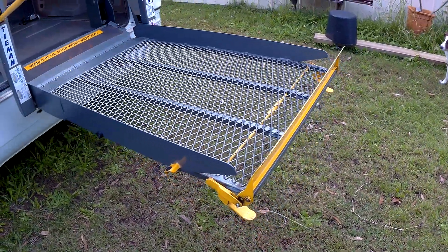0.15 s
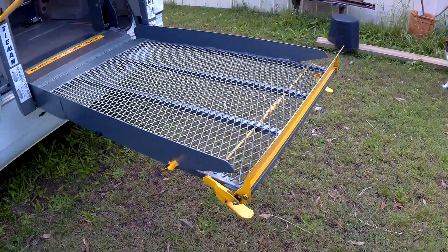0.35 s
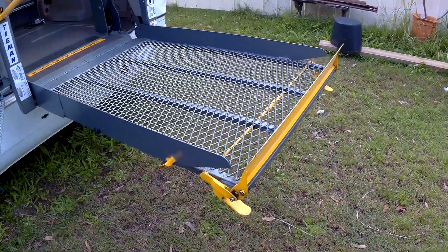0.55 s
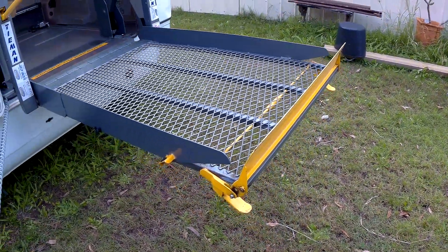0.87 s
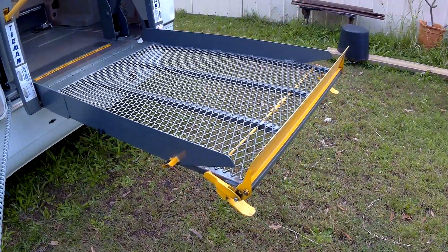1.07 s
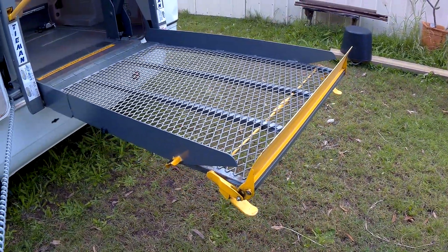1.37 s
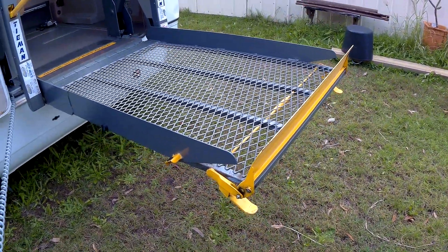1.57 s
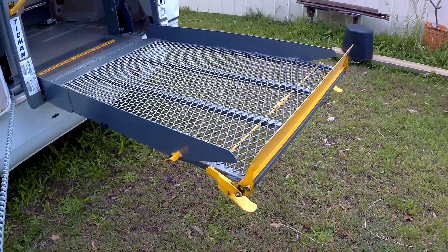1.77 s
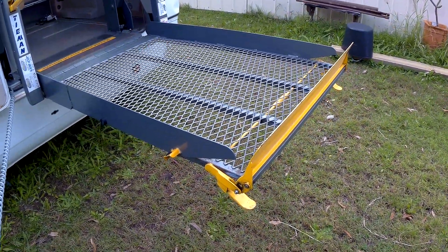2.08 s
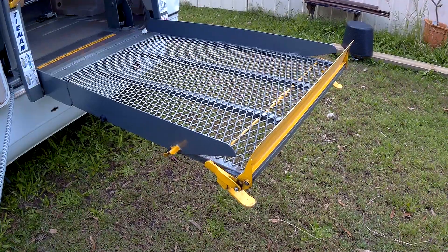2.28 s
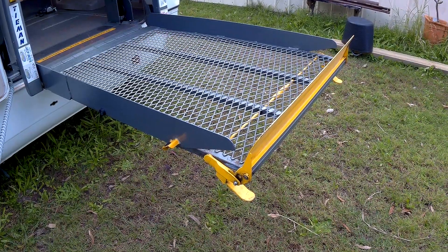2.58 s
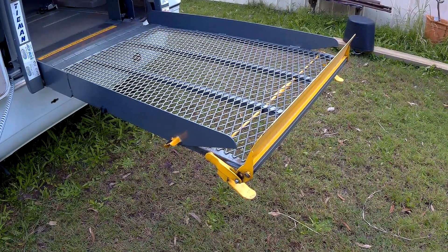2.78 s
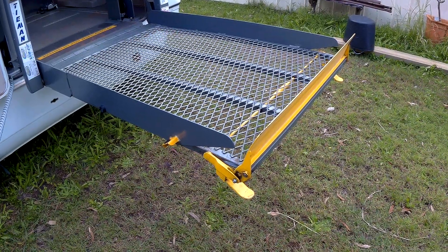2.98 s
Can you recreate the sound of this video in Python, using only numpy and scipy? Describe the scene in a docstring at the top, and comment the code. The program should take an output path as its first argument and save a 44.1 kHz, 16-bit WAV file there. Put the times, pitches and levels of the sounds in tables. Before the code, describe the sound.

A wheelchair lift's electric pump motor whines steadily, cuts out abruptly with a metallic clunk and bounce, while a diesel engine idles nearby; outdoors, one microphone, soft air noise and a late wind puff.

```python
"""Wheelchair lift stopping beside an idling diesel

Outdoors by a vehicle lift: its electric pump motor whines as tones on multiples of the shaft speed over hiss,
then cuts out with a clunk and a bounce, made of struck frame modes, shaken noise and a booming floor panel.
A four-cylinder diesel idles nearby, a throb with knocks, puffs and pops, and speeds up a little when the load drops.
Shaped noise gives the air and rumble; low swelling tones buffet the microphone, with a late puff of wind."""
import sys
import numpy as np
from scipy import signal
from scipy.fft import rfft, irfft, next_fast_len
from scipy.io import wavfile
from scipy.ndimage import uniform_filter1d

SR = 44100
rng = np.random.default_rng(int(sys.argv[2]) if len(sys.argv) > 2 else 0)


def transcribe(u):
    """Save the signal u as a 16-bit wav file named by the first command-line argument.

    u: samples, shape (n,) or (channels, n), limited to [-1, 1]; the rate is SR.
    q: integer samples, one column per channel.
    """
    v = np.clip(np.atleast_2d(u).T, -1, 1)
    q = np.round(v * 32767).astype(np.int16)
    wavfile.write(sys.argv[1], SR, q)


def linear_from_db(decibels):
    """Turn decibels (scalar or array-like) into linear amplitude factors; 0 gives 1."""
    return 10 ** (np.asarray(decibels, float) / 20)


N = 138474   # samples


def rms_one(x):
    """Scale to rms 1."""
    return x / np.sqrt(np.mean(x ** 2) + 1e-20)


def in_time(rows):
    """Join (seconds, value) rows by straight lines."""
    return np.interp(np.arange(N) / SR, *np.transpose(rows))


def drift(rate):
    """Slow random wander of spread 1, faster for a higher rate in Hz."""
    r = np.exp(-80 * np.pi * rate / SR)   # one step per 40 samples
    noise = rng.standard_normal(N // 40 + 2002)
    slow = signal.lfilter([1], [1, -2 * r, r * r], noise)[2000:]
    return np.interp(np.arange(N) / 40, np.arange(len(slow)), rms_one(slow))


def coloured(spectrum):
    """Noise of a (Hz, relative dB per Hz) spectrum, scaled to rms 1."""
    size = next_fast_len(N)
    hz, db = np.transpose(spectrum)
    bins_hz = np.arange(size // 2 + 1) * SR / size
    gain = linear_from_db(np.interp(np.log(bins_hz + 1), np.log(hz), db, left=-90, right=-90))
    return rms_one(irfft(rfft(rng.standard_normal(size)) * gain, size)[:N])


def dying(clicks, t60):
    """Each click starts an envelope that dies by 60 dB in t60 seconds."""
    return signal.lfilter([1], [1, -linear_from_db(-60 / (t60 * SR))], clicks + 1e-18)


def resonant(table):
    """Noise through (Hz, width in Hz, rms dB) resonances, each passed twice."""
    out = 0
    for hz, width, db in table:
        r = np.exp(-np.pi * width / SR)
        a = [1, -2 * r * np.cos(2 * np.pi * hz / SR), r * r]
        once = signal.lfilter([1], a, rng.standard_normal(N))
        out = out + linear_from_db(db) * rms_one(signal.lfilter([1, 0, -1], a, once))
    return out


def bursts(clicks, t60):
    """Dying envelopes of the clicks, a row each, their sum scaled to rms 1."""
    rows = uniform_filter1d(dying(clicks, t60), size=240)
    return rows / np.sqrt(np.mean(rows.sum(axis=0) ** 2))


def ring(clicks, hz, t60):
    """A unit click sets a dying sine of starting height 1 ringing."""
    r, w = linear_from_db(-60 / (t60 * SR)), 2 * np.pi * hz / SR
    return signal.lfilter([0, np.sin(w)], [1, -2 * r * np.cos(w), r * r], clicks + 1e-18)


STRENGTH_SPREAD_DB = 1.2


def firings(crank, at):
    """One click per firing, a row for each of four cylinders, strength by chance; at is in firings."""
    count = np.floor(crank - at).astype(int) + 1
    sizes = linear_from_db(STRENGTH_SPREAD_DB * rng.standard_normal(80))
    cylinder_turn = (count - 1) % 4 == np.arange(4)[:, None]
    return np.diff(count, prepend=count[0]) * sizes[count] * cylinder_turn


# Idle speed of the diesel nearby. Each row: time in seconds, firings per second.
FIRING = [(0, 21.783), (.845, 21.644), (.993, 22.729), (1.105, 22.129), (2.097, 21.66), (3.14, 21.705)]
CRANK_START = .135   # firings


def crank_position():
    """Crank position counted in firings, the running sum of the engine speed."""
    return CRANK_START + np.cumsum(in_time(FIRING)) / SR


# Exhaust throb at the microphone. Each entry: rms in dB before waver, for multiples 1, 2, .. of the firing rate.
EXHAUST_DB = [-52.5, -63.5, -61, -60.5, -78, -65.5, -67.5]
EXHAUST_WAVER_DB = 1.08   # for the first multiple, wider for higher ones
MUFFLER_HZ, MUFFLER_Q = 54, 4


def exhaust_throb(crank):
    """A pressure dip per firing, built of harmonics whose overtones the muffler shifts in phase."""
    throb = 0
    for k, db in enumerate(EXHAUST_DB, 1):
        ratio = k * FIRING[0][1] / MUFFLER_HZ
        lead = np.arctan(MUFFLER_Q * (1 / ratio - ratio)) * (k > 1)
        level = db + EXHAUST_WAVER_DB * np.sqrt(k) * drift(2.0)
        throb = throb - np.sqrt(2) * linear_from_db(level) * np.cos(2 * np.pi * k * (crank - .5) + lead * 1.0)
    return throb


# Block resonance shared by all cylinders. Each row: Hz, width in Hz, rms dB before the swell.
BLOCK = [(4060, 860, -93.5)]
# Duller ring after each knock. Each row: Hz, width in Hz, dB before the cylinder's tail level and the swell.
TAIL = [(2044, 460, -81)]
# Knock of each cylinder. Each row: relative strength in dB, resonance in Hz, relative level of its dull tail in dB.
CYLINDERS = [(0, 2290, 0), (-4, 2330, -1), (-2, 2470, -7), (1.5, 2450, 0)]
# Gain on all the knocking. Each row: time in seconds, gain in dB.
KNOCK_SWELL = [(0, 2.5), (1.0, 2), (1.6, 3), (2.3, 1.5), (3.14, 0)]
KNOCK_AT = .86   # part of a firing
KNOCK_WIDTH_HZ, KNOCK_DB, KNOCK_T60_S = 480, -76.5, .13   # dB before the swell
TAIL_LAG_S = 0.0037
PING_DB, PING_T60_S = -61, .018   # clean ring at the start of each knock, dB before strength and swell


def block_knock(crank):
    """Each firing knocks the block: a noise burst through resonances, a clean ping and a lagging dull tail."""
    block, tail, knock = resonant(BLOCK), resonant(TAIL), 0
    clicks = firings(crank, KNOCK_AT) * linear_from_db(np.array(CYLINDERS)[:, :1])
    for click, burst, (_, hz, tail_db) in zip(clicks, bursts(clicks, KNOCK_T60_S), CYLINDERS):
        knock = knock + burst * (block + resonant([(hz, KNOCK_WIDTH_HZ, KNOCK_DB)]))
        knock = knock + linear_from_db(PING_DB) * ring(click, hz, PING_T60_S)
        knock = knock + linear_from_db(tail_db) * np.roll(burst, int(TAIL_LAG_S * SR)) * tail
    return linear_from_db(in_time(KNOCK_SWELL)) * knock


# Tailpipe resonances. Each row: Hz, width in Hz, rms dB.
PUFF = [(720, 260, -68), (520, 200, -71), (1150, 400, -77)]
# Tailpipe pop, weakest soon after the clunk. Each row: time in seconds, ring height in dB before softening.
POP = [(0, -50.5), (.7, -47), (.9, -61.5), (3.14, -49)]
PUFF_AT = .17   # part of a firing
PUFF_T60_S, POP_HZ, POP_T60_S = 0.098, 730, 0.031


def tailpipe(crank):
    """Each firing sends a puff of resonant noise and a softened ringing pop out of the tailpipe."""
    valve = firings(crank, PUFF_AT)
    puffs = resonant(PUFF) * bursts(valve, PUFF_T60_S).sum(axis=0)
    soft = uniform_filter1d(ring(valve.sum(axis=0), POP_HZ, POP_T60_S), size=20)
    return puffs + linear_from_db(in_time(POP)) * soft


def diesel():
    """One crank times the exhaust throb, the knock in the block and the tailpipe."""
    crank = crank_position()
    return exhaust_throb(crank) + block_knock(crank) + tailpipe(crank)


# Motor speed up to the stop. Each row: time in seconds, shaft turns per second.
SHAFT = [(0, 107), (.3, 106.8), (.55, 107.1), (.72, 107.1)]
# Tones of the whine, gear teeth by 11 and commutator by 23. Each entry: multiple of the shaft speed.
MULTIPLES = [3, 9, 11, 22, 23, 26, 29, 31, 32, 33, 34, 35, 44, 46, 55, 66, 69, 77, 78, 88, 99, 100, 121,
             132]
# A row for each of those multiples: rms in dB before waver, at even steps from start to stop.
WHINE_DB = [(-62.5, -62.5, -62.5, -63.5), (-73, -73, -76, -71.5), (-66, -66.5, -66, -68, -70, -70, -76),
            (-83, -79, -83, -81), (-69.5, -70.5, -76, -73, -75, -70.5, -63.5), (-90, -82, -84, -92),
            (-91, -100, -102, -95), (-89, -92, -102, -97), (-87, -96, -96, -93), (-78.5, -79, -82, -80),
            (-88, -86, -85, -87), (-89, -83, -87, -91), (-101, -102, -92, -89),
            (-97, -95, -86, -79.5, -91, -100, -94), (-87, -85, -86, -96, -94, -89, -81),
            (-83, -87, -95, -83, -82, -84, -84, -84, -84, -82, -81, -80, -80), (-90, -91, -87, -87),
            (-104, -99, -97, -99), (-104, -100, -97, -101), (-102, -102, -100, -102),
            (-95, -90, -103, -94, -92, -94, -99), (-99, -99, -99, -99),
            (-88, -87, -101, -103, -101, -96, -99), (-105, -105, -105, -103)]
# Brush hiss. Each row: Hz, relative dB per Hz.
BRUSHES = [(900, -26), (1200, -1), (2500, -7.5), (4000, -18), (8000, -22.5), (14000, -21), (16000, -34)]
BRUSHES_DB, WHINE_WAVER_DB = -73, 1.5
SPEED_JITTER = 0.00051   # part of the speed
STOP_S, CUT_S = .722, 0.0041   # fade begins, length of the fade


def pump_motor():
    """Wavering tones on multiples of the shaft speed over brush hiss, until the current is cut."""
    turns = np.cumsum(in_time(SHAFT) * (1 + SPEED_JITTER * drift(13.0))) / SR
    out = linear_from_db(BRUSHES_DB + drift(3.6)) * coloured(BRUSHES)
    for multiple, db in zip(MULTIPLES, WHINE_DB):
        steps = np.linspace(0, STOP_S, len(db))
        level = in_time(list(zip(steps, db))) + WHINE_WAVER_DB * drift(14.0)
        out = out + np.sqrt(2) * linear_from_db(level) * np.sin(2 * np.pi * (multiple * turns + rng.random()))
    return out * np.clip((STOP_S - np.arange(N) / SR) / CUT_S + 1, 0, 1)


# Open air and traffic around the place. Each row: Hz, relative dB per Hz.
AIR = [(56, -23), (95, -4), (191, -3.5), (222, -8.5), (275, -8), (362, -11), (420, -8), (714, -11.5),
       (1700, -29.5), (2340, -31.5), (4620, -46), (13400, -48), (15200, -57)]
AIR_DB, RUMBLE_DB = -55.5, -65


def air_and_rumble():
    """Broad air and traffic noise that wavers gently, over a steady deep rumble."""
    air = linear_from_db(AIR_DB + 0.49 * drift(4.5)) * coloured(AIR)
    return air + linear_from_db(RUMBLE_DB) * coloured([(35, -21.5), (60, 1.5), (100, -7), (130, -24.5)])


# Wind on the microphone, strongest late. Each row: time in seconds, rms in dB before waver.
WIND = [(0, -69), (1.1, -70), (1.6, -65), (2.1, -67), (2.75, -66), (2.9, -60), (3.0, -59), (3.07, -53),
        (3.14, -54)]


def wind():
    """Low noise made lumpy by a fast random wander of its level."""
    spectrum = [(45, -25), (100, -8), (189, 0), (320, -6), (620, -9), (900, -22), (1500, -45)]
    return linear_from_db(in_time(WIND) + 2.5 * drift(8.9)) * coloured(spectrum)


RATTLE_T60_S = 0.19


def shaken(at, db, spectrum):
    """Noise that jumps up at each contact and dies."""
    clicks = np.zeros(N)
    clicks[at] = linear_from_db(db)
    return uniform_filter1d(dying(clicks, RATTLE_T60_S), size=130, origin=64) * coloured(spectrum)


# Contacts of the clunk and bounce. Each row: start in seconds, level in dB, brightness in dB per octave above MIDDLE_HZ.
HITS = [(0.7198, -55.5, 0.3), (0.729, -56, 4), (0.7382, -54.5, -5), (.772, -56, -1), (0.724, -51, 0.6),
        (0.7338, -49, -1), (.745, -62, -13), (0.76, -62, -10), (0.79, -57.5, -1), (0.832, -51, -6),
        (0.8771, -53, -11)]
# Steel frame modes. Each row: Hz, level in dB relative to the contact, t60 in seconds.
FRAME = [(479, -19, 0.1), (683, -11, 0.072), (786, -15, 0.078), (1003, -24, 0.12), (1110, -8, 0.081),
         (1308, -7, 0.06), (1770, -18, 0.069), (1840, -9, .1), (2083, -14, 0.16), (2310, -13, 0.16),
         (3320, -19, 0.08), (3600, -24, 0.087), (4150, -30, 0.083), (6950, -21, 0.044), (7900, -31, 0.087),
         (8080, -18, 0.05)]
# Mesh rattle. Each row: Hz, relative dB per Hz.
RATTLE = [(300, -11), (700, 4.5), (1200, 7), (2200, -7), (4000, -15), (6000, -28.5), (7000, -45)]
# Treble jingle of the mesh. Each row: Hz, relative dB per Hz.
JINGLE = [(4000, -26), (6000, -11.5), (8200, 0), (9500, -12), (15000, -14), (16000, -38)]
RATTLE_DB, JINGLE_DB = -10, -26.5   # relative to the contact, the jingle before brightness
MIDDLE_HZ = 1270
CONTACT_T60_S = 0.016   # each contact is a short grind


def clunk():
    """Each contact rings the steel frame and shakes the mesh into a short rattle."""
    start_s, db, bright_db = np.transpose(HITS)
    at, out = (start_s * SR).astype(int), 0
    for hz, level_db, t60 in FRAME:
        clicks = np.zeros(N)
        clicks[at] = linear_from_db(db + level_db + bright_db * max(np.log2(hz / MIDDLE_HZ), 0))
        scrape = dying(clicks, CONTACT_T60_S) * rng.standard_normal(N) / np.sqrt(CONTACT_T60_S * SR / 10)
        out = out + ring(clicks + 0.66 * scrape, hz, t60)
    rattle = shaken(at, db + RATTLE_DB, RATTLE)
    jingle = shaken(at, db + JINGLE_DB + 2 * bright_db, JINGLE)   # two octaves' worth of brightness
    return out + rattle + jingle


# Modes of a floor panel struck once. Each row: Hz, height in dB before the swell-in, t60 in seconds.
PANEL = [(253.8, -36.5, 0.22), (1140, -61, 0.092), (1440, -46, 0.19), (1910, -49.5, 0.1)]
PANEL_S, PANEL_RISE_S = .721, 0.0082   # start, time constant of the rise


def panel():
    """A low boom and a few rings that swell at the stop and die."""
    t = np.maximum(np.arange(N) / SR - PANEL_S, 0)
    rings = sum(linear_from_db(db - 60 * t / t60) * np.sin(2 * np.pi * hz * t) for hz, db, t60 in PANEL)
    return (1 - np.exp(-t / PANEL_RISE_S)) * rings


# Wind buffets on the microphone. Each row: middle in seconds, peak in dB, Hz, length in seconds.
BUFFETS = [(2.2, -56, 188, .25), (2.89, -48, 88, .11), (3.0, -51, 200, .08), (3.043, -44, 158, .075),
           (3.075, -51, 280, .05), (3.088, -48, 100, .05), (3.125, -46, 112, .06)]


def buffets():
    """Each buffet is a soft low thump, a sine that swells and fades."""
    t, out = np.arange(N) / SR, 0
    for middle_s, db, hz, length in BUFFETS:
        swell = np.cos(np.pi * np.clip((t - middle_s) / length, -.5, .5)) ** 2
        out = out + linear_from_db(db) * swell * np.sin(2 * np.pi * (hz * t + rng.random()))
    return out


def scene():
    """Everything together at one microphone, one channel."""
    outdoors = air_and_rumble() + wind() + buffets()
    return (diesel() + pump_motor() + clunk() + panel() + outdoors)[None]


def top_cut(x):
    """Nothing passes above the cut-off."""
    return signal.sosfilt(signal.butter(12, 15330, fs=SR, output="sos"), x)


def record(dry):
    """Takes the microphone mix and passes it through the recorder's cut-off of the treble."""
    return top_cut(dry)


dry = scene()
out = record(dry)
transcribe(out)
```